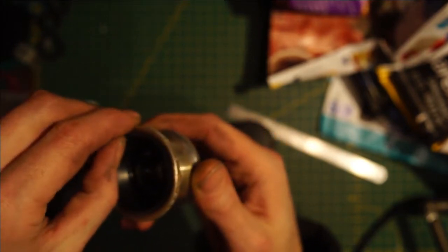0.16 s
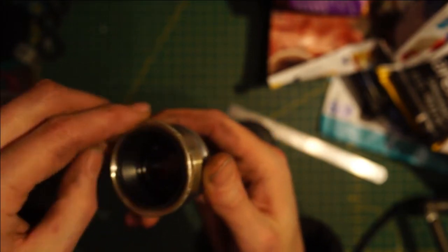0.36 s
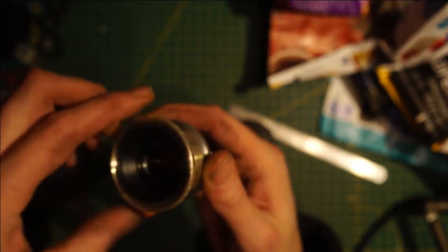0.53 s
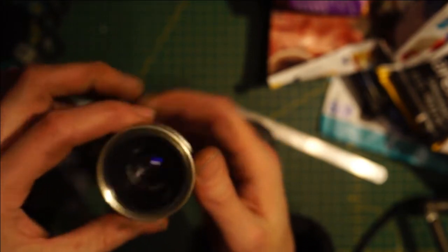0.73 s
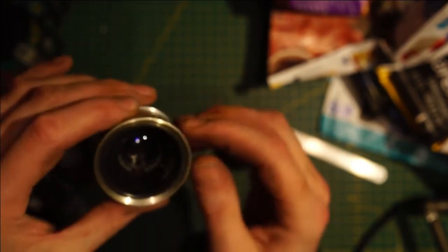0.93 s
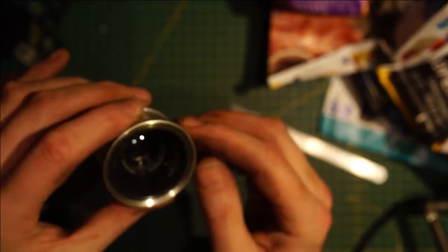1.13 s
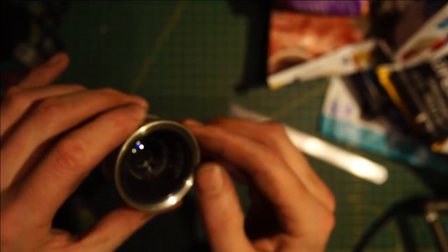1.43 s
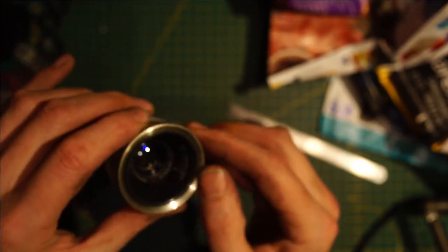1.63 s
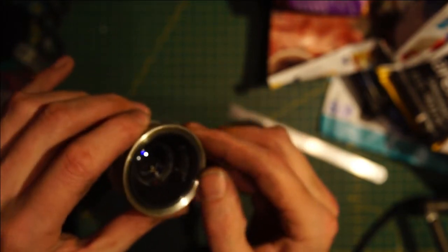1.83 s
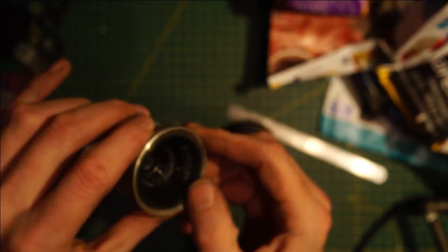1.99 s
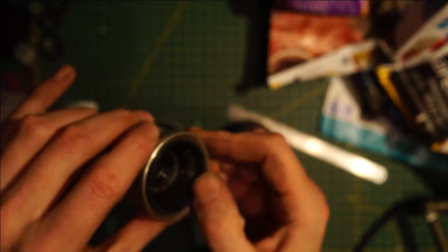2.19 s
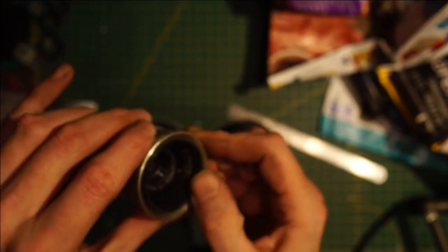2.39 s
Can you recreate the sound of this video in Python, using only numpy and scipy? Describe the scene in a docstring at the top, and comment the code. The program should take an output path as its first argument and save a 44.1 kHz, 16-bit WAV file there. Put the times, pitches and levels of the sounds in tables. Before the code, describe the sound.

Quick metallic clicks of a small lens part turned by hand, then a softer single snap

```python
"""A small metal lens barrel is turned in the fingers over a desk, close to the microphone.
Its ring slips over its seat in four quick clicks, and later an inner part snaps into place: impulses
excite damped modes, with a noise burst at each contact. Between them it scuffs once, as banded grains.
Diffuse reflections follow each sound. Shaped room noise and hiss lie behind, with a faint hum of
two beating tones."""
import sys
import numpy as np
from scipy import signal
from scipy.fft import rfft, irfft
from scipy.io import wavfile

SR = 44100
rng = np.random.default_rng(int(sys.argv[2]) if len(sys.argv) > 2 else 0)


def wav_out(sig):
    """Save sig, one row per channel (or a flat mono array), as 16-bit PCM at SR to the path in sys.argv[1]."""
    wavfile.write(sys.argv[1], SR, np.round(np.clip(np.atleast_2d(sig).T, -1, 1) * 32767).astype(np.int16))


N = 112454
T = np.arange(N) / SR  # time (s)

# A hum of two tones almost in tune, perhaps fans. Each entry: pitch in Hz.
HUM_PITCHES = (355.9, 368.0)
# The same two tones. Each entry: level in dB rms.
HUM_LEVELS = (-63, -64)
# Spectrum of room noise and hiss. Each row: frequency in Hz, relative level in dB per Hz.
FLOOR_SPECTRUM = [(25, -38), (45, -23), (65, -13), (90, -7.5), (120, -10), (165, 0.5), (290, -0.5),
                  (480, -5), (680, -4), (830, -1), (1100, -7), (2500, -10.5), (5000, -15), (10800, -20)]
# The ring slips and strikes the barrel. Each row: start in seconds, level in dB at or below the pivot,
# brightness in dB per octave above it.
RING_SLIPS = [(0.2232, -21.5, -6.5), (0.2334, -19.5, 7), (0.2432, -13, 2.5), (0.2503, -12, -2)]
# The inner part seats. Each row: start in seconds, level in dB at or below the pivot,
# brightness in dB per octave above it.
SEATING_SNAPS = [(2.0660, -26, -3)]
# Levels in the three mode tables are further weighted row by row by the step ratio given in scene().
# Modes of the barrel, damped by the fingers. Each row: pitch in Hz, level in dB, t60 in seconds.
BARREL_MODES = [(2050, -15.5, .011), (2630, -10, 0.0084), (3256, 1, 0.0074), (3620, -1.5, 0.0066),
                (4130, -9, 0.015), (4780, -8.5, 0.011), (6220, -18, 0.0037), (7160, -19, 0.016),
                (8450, -16.5, 0.0023), (9400, -18.5, 0.0053), (10350, -19, 0.0071)]
# Faint after-ring of the barrel's free rim. Each row: pitch in Hz, level in dB, t60 in seconds.
RIM_MODES = [(2544, -39, 0.12), (2960, -33, 0.06), (3973, -42, .09), (4190, -32, 0.12), (4484, -53, 0.074),
             (4740, -36, 0.15), (7186, -62, .08)]
# Modes of the inner part. Each row: pitch in Hz, level in dB, t60 in seconds.
INNER_MODES = [(1800, -8, 0.021), (2340, -4.5, 0.0087), (2770, 0.5, 0.013), (2880, -19, 0.12),
               (3550, -31, .006), (4700, -9, 0.012), (6470, -6, 0.016), (6900, -2, 0.011),
               (7800, -8, 0.0082), (8300, -19, 0.013), (10100, -32, .005)]
# The ring scuffs along its seat. Each row: start in seconds, length in seconds, level in dB.
SCUFF_STROKES = [(1.007, .017, -53), (1.023, 0.012, -53.5)]

FLOOR_DB = -54.5  # rms
PIVOT_HZ = 3060  # brightness tilts the modes above this pitch
RADIATION_HZ = 1830  # parts this small give off little below this pitch
CRACK_DB, CRACK_T60_S, CRACK_LOW_HZ = -15.5, 0.016, 400  # the rough instant of contact
DESK_DELAY_S, ROOM_DB, ROOM_T60_S = 0.005, -13.5, 0.077
GRAINS_PER_S, SCUFF_LOW_HZ, SCUFF_HIGH_HZ = 6000, 3220, 4760
SCUFF_HISS_DB = -5  # broad hiss relative to the scuff's main band
CUTOFF_HZ = 11000


def from_db(db):
    """A level in decibels is twenty times the logarithm of amplitude; this inverts it."""
    return 10 ** (np.asarray(db) / 20)


def filtered(x, order, hz, kind):
    """A Butterworth filter passes its band with a maximally flat response."""
    return signal.sosfilt(signal.butter(order, hz, kind, fs=SR, output="sos"), x)


def dying_noise(t60):
    """Exponential decay: a quarter second of noise falls at 60 dB per t60."""
    t = T[:SR // 4]
    decay = np.exp(-np.log(1000) * t / t60)
    return rng.standard_normal(len(t)) * decay


def hum():
    """Beating: two steady tones drift in and out of phase about twelve times a second."""
    tones = 0
    for hz, db in zip(HUM_PITCHES, HUM_LEVELS):
        peak = np.sqrt(2) * from_db(db)
        tones = tones + peak * np.cos(2 * np.pi * hz * T)
    return tones


def floor():
    """Spectral shaping: white noise is weighted into steady room noise and microphone hiss."""
    hz, db = np.transpose(FLOOR_SPECTRUM)
    bins = np.maximum(np.fft.rfftfreq(N, 1 / SR), 1)
    weights = from_db(np.interp(np.log(bins), np.log(hz), db))
    noise = irfft(rfft(rng.standard_normal(N)) * weights, N)
    return from_db(FLOOR_DB) * noise / noise.std()


def clicks(hits, hz):
    """Impulse excitation: each hit is one sample, as strong as that hit is at the given pitch."""
    start, db, brightness = np.transpose(hits)
    octaves_above = max(np.log2(hz / PIVOT_HZ), 0)
    impulses = np.zeros(N)
    impulses[(start * SR).astype(int)] = from_db(db + brightness * octaves_above)
    return impulses


def ring(x, hz, t60):
    """Damped resonance: a pole pair rings at one pitch, starting near height 1 for a unit click."""
    radius = from_db(-60 / (t60 * SR))
    angle = 2 * np.pi * hz / SR
    poles = [1, -2 * radius * np.cos(angle), radius * radius]
    return signal.lfilter([1, 0, -1], poles, x + 1e-18) / 2  # the offset avoids denormal numbers


def struck(hits, modes, step_ratio):
    """Modal superposition: each row's amplitude is weighted by step_ratio to the row number.

    A positive ratio keeps modes in step for a spike; a negative one opposes neighbours, for a rounder attack.
    """
    rings = 0
    for k, (hz, db, t60) in enumerate(modes):
        amplitude = step_ratio ** k * from_db(db)
        rings = rings + amplitude * ring(clicks(hits, hz), hz, t60)
    return filtered(rings, 2, RADIATION_HZ, "high")


def cracks(hits):
    """Rough contact: each hit starts with its own very short noise burst, stronger if bright."""
    bursts = 0
    for hit in hits:
        impulse = clicks([hit], 2 * PIVOT_HZ)  # strength one octave above the pivot
        bursts = bursts + signal.fftconvolve(impulse, dying_noise(CRACK_T60_S))[:N]
    return from_db(CRACK_DB) * filtered(bursts, 1, CRACK_LOW_HZ, "high")


def room(x):
    """Diffuse reflection: the desk and its clutter return a short delayed, decaying noise tail."""
    delay = np.zeros(int(DESK_DELAY_S * SR))
    tail = np.concatenate([delay, dying_noise(ROOM_T60_S)])
    unit_energy = tail / np.linalg.norm(tail)
    return from_db(ROOM_DB) * signal.fftconvolve(x, unit_energy)[:N]


def scuffs():
    """Friction: dense tiny catches of metal on metal sound mostly in the barrel's strongest range."""
    caught = rng.random(N) < GRAINS_PER_S / SR
    grains = caught * rng.standard_normal(N)
    rub = filtered(grains, 4, [SCUFF_LOW_HZ, SCUFF_HIGH_HZ], "band")
    pressure = 0
    for start, length, db in SCUFF_STROKES:
        progress = np.clip((T - start) / length, 0, 1)
        swell = np.sqrt(np.abs(np.sin(np.pi * progress)))
        pressure = pressure + from_db(db) * swell
    hiss = from_db(SCUFF_HISS_DB) * grains / grains.std()
    return pressure * (rub / rub.std() + hiss)


def scene():
    """Linear superposition: the handled lens, its reflections and the background add."""
    background = hum() + floor()
    barrel = struck(RING_SLIPS, BARREL_MODES, step_ratio=-1.016)
    rim = struck(RING_SLIPS, RIM_MODES, step_ratio=-0.74)
    inner = struck(SEATING_SNAPS, INNER_MODES, step_ratio=0.95)
    lens = barrel + rim + inner + cracks(RING_SLIPS + SEATING_SNAPS) + scuffs()
    return (lens + room(lens) + background)[None]


def record(dry):
    """Band limiting: an elliptic low-pass cuts the top steeply."""
    low_pass = signal.ellip(12, 0.1, 70, CUTOFF_HZ, fs=SR, output="sos")  # ripple, stopband in dB
    return signal.sosfilt(low_pass, dry)


dry = scene()
out = record(dry)
wav_out(out)
```